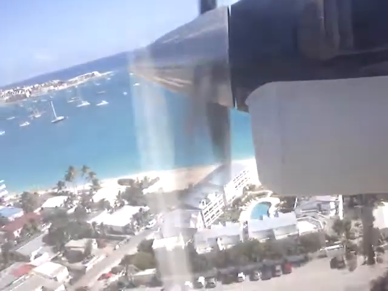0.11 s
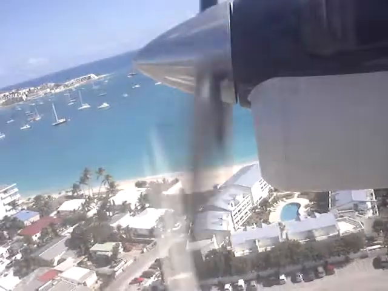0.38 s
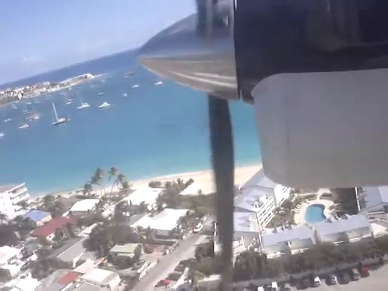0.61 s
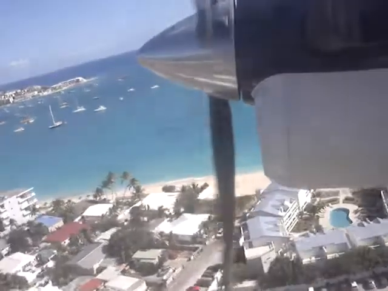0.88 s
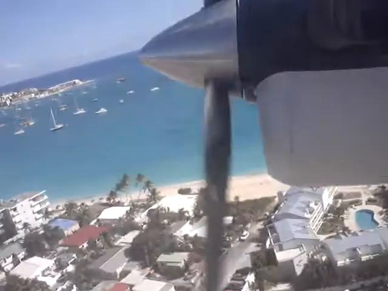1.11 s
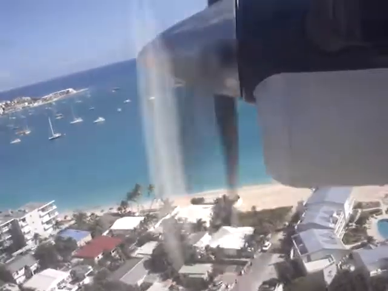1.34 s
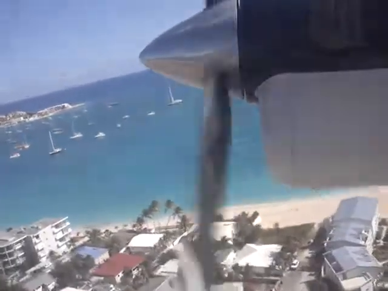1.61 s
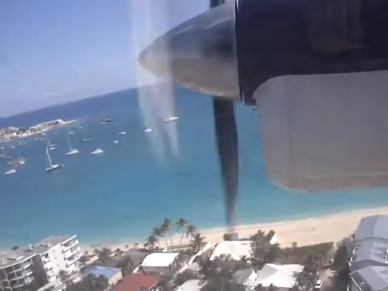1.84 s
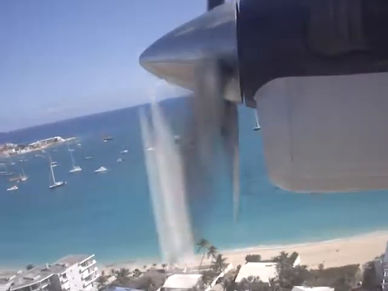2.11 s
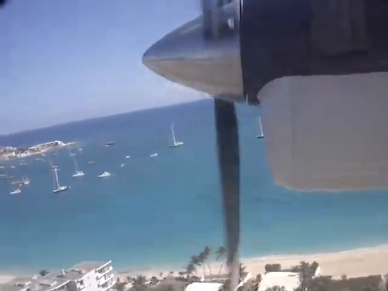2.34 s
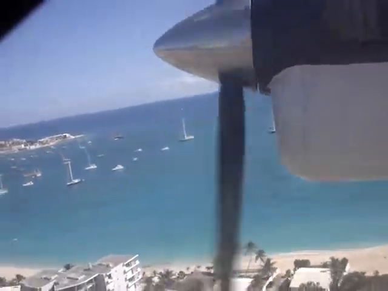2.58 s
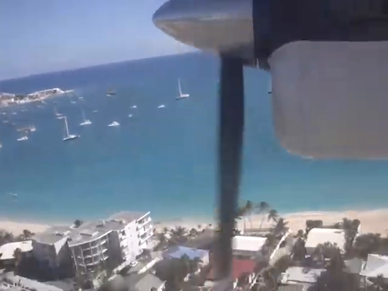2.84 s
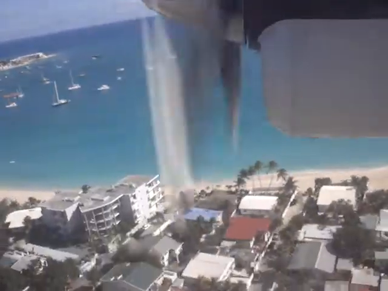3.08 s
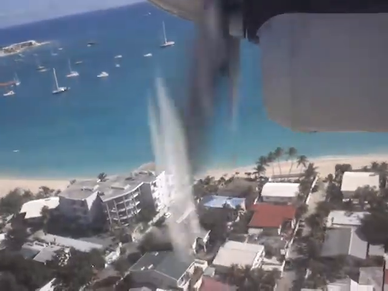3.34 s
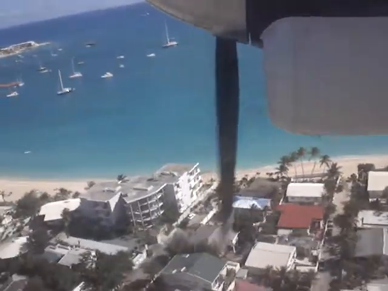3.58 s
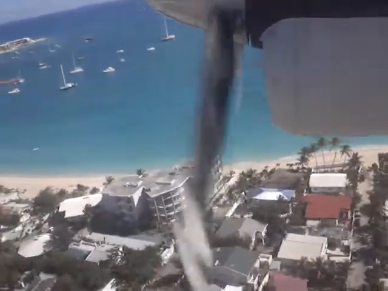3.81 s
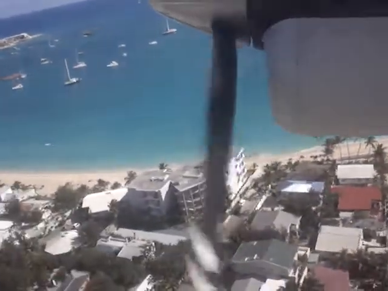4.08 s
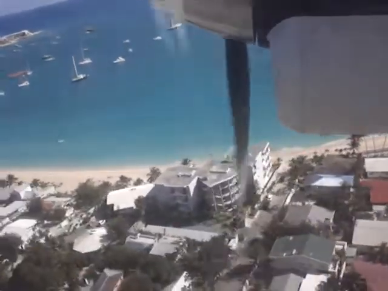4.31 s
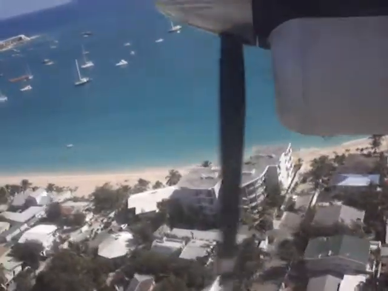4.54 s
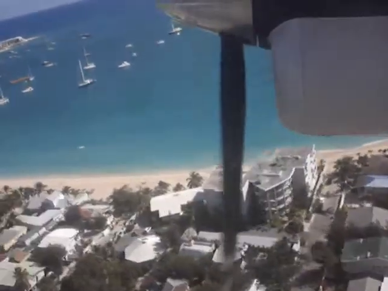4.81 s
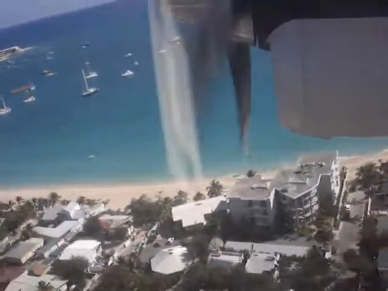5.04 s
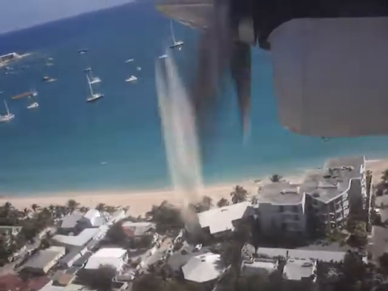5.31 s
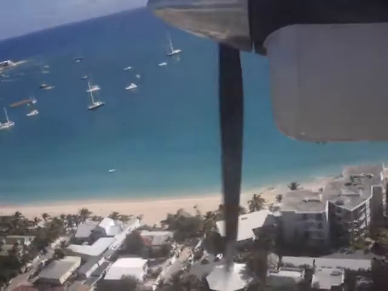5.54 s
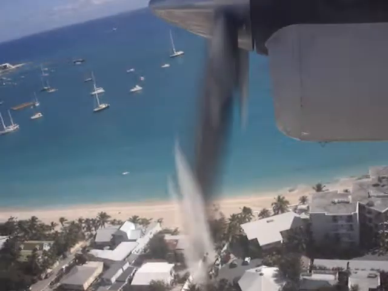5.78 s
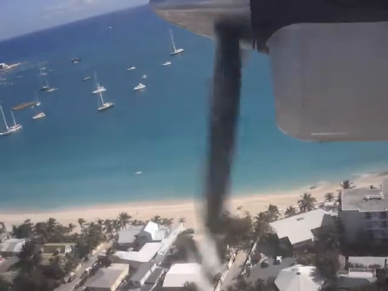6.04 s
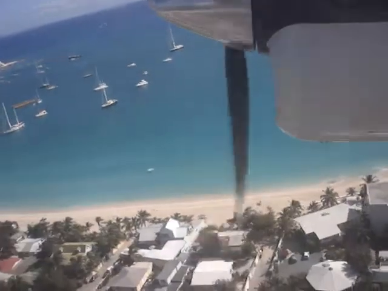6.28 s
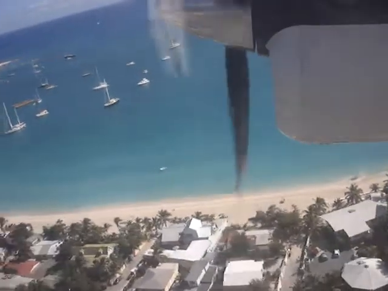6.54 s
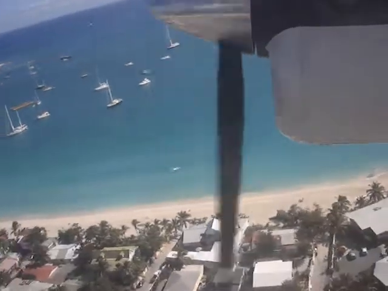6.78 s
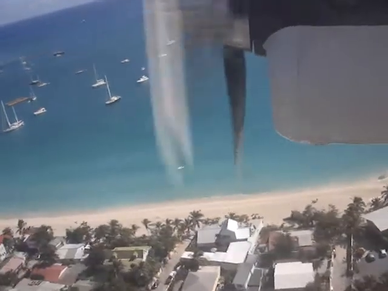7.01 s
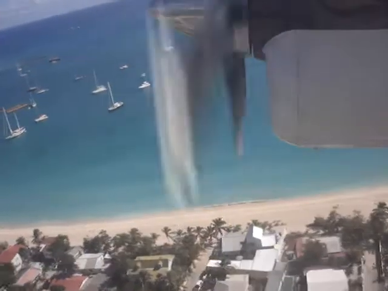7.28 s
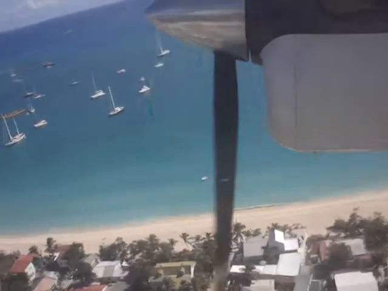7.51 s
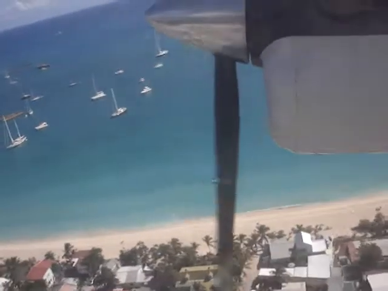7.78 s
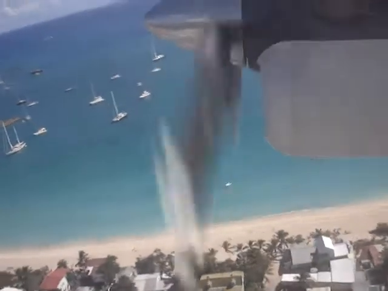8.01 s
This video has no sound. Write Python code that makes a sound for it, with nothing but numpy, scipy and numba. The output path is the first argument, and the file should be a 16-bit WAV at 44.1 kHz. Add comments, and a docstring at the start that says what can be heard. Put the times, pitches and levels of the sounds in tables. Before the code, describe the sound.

Loud steady buzzing drone of twin propellers heard inside an aircraft cabin, slowly throbbing about once a second over a broad rush of air.

```python
"""Eight seconds inside the cabin of a climbing twin propeller aircraft. From the start, two three-bladed propellers
drone at slightly different speeds, so their harmonics beat, and both ring the same cabin modes. Air roars along
the hull, thinning slowly; turbines whine and gears whistle faintly. For the first five seconds the roar at times
swells and the near third harmonic swells or dips; from 1.25 s to the end the whistle swells four times.
Throughout, an automatic gain control pumps with the beats."""
import sys
import numpy as np
from scipy import signal
from scipy.fft import rfft, irfft, next_fast_len
from scipy.io import wavfile
from scipy.ndimage import uniform_filter1d, minimum_filter1d, map_coordinates
from numba import njit

SR = 44100
rng = np.random.default_rng(int(sys.argv[2]) if len(sys.argv) > 2 else 0)


def to_wav(sig):
    """Store sig (one row per channel, or 1-D mono) as 16-bit WAV at the path in sys.argv[1].

    Samples outside -1..1 are clipped; the rate is SR.
    """
    pcm = np.clip(np.atleast_2d(sig), -1, 1) * 32767
    pcm = np.round(pcm).astype(np.int16)
    wavfile.write(sys.argv[1], SR, pcm.T)  # frames by channels


def volts_from_db(level):
    """Convert decibel levels to linear amplitude ratios."""
    exponent = np.asarray(level, float) / 20
    return 10 ** exponent


N = 358533


def unit(x):
    """Scale a sound to an rms of 1."""
    return x / np.sqrt(np.mean(x ** 2) + 1e-20)


def curves(rows):
    """Join the points of a table by straight lines: one curve for each column after the time."""
    seconds, *columns = np.transpose(rows)
    return [np.interp(np.arange(N) / SR, seconds, column) for column in columns]


def wobble(rate):
    """Draw a smooth random curve through `rate` random points a second."""
    points = rng.standard_normal(int(N * rate / SR) + 4)
    return map_coordinates(points, [np.arange(N) * rate / SR])


def filtered(x, response):
    """Multiply the spectrum of x by a response, given as a function of frequency in Hz."""
    size = next_fast_len(N + 8192)
    spectrum = rfft(x, size) * response(np.fft.rfftfreq(size, 1 / SR))
    return irfft(spectrum, size)[:N]


# Blade passing rate of the near propeller as its governor hunts: (time [s], rate [Hz])
NEAR_RATE = [(0.0, 104.25), (0.43, 104.81), (1.0, 104.704), (1.44, 104.104), (3.6, 104.829),
             (4.33, 104.572), (4.67, 104.852), (5.71, 104.82), (5.82, 104.659), (7.3, 104.847),
             (7.48, 105.101), (8.13, 104.525)]
# How much faster the far blades pass, which is the beat rate of the fundamentals: (time [s], difference [Hz])
FAR_LEAD = [(0.0, 1.06), (0.4, 0.784), (0.63, 1.196), (1.31, 1.288), (1.63, 0.622), (1.96, 1.809),
            (2.22, 2.13), (2.64, 1.391), (2.85, 0.521), (3.2, 1.03), (3.88, 1.349), (4.47, 0.906),
            (5.22, 1.225), (6.36, 1.138), (6.57, 1.29), (7.13, 0.912), (7.24, 1.123), (8.13, 1.357)]


def blade_rates():
    """Blade passes per second of the near and the far propeller; their difference makes the beats."""
    near_hz = curves(NEAR_RATE)[0]
    return near_hz, near_hz + curves(FAR_LEAD)[0]


# Passing level changes: the roar swells or stays, the near third harmonic swells or dips:
# (peak time [s], build-up time [s], change of roar [dB], change of third harmonic [dB])
LEVEL_CHANGES = [(0.05, .3, 1, 0.5), (.7, .2, 0, -2.5), (1.02, .15, 0.5, -1), (1.4, .2, .5, 2.5),
                 (1.94, .1, 0, 1), (2.43, .3, 0.5, -1.5), (2.82, .4, 3, 6), (3.8, .2, 1.5, 0.5),
                 (4.71, .2, 1, 1)]


def level_changes():
    """Level changes of roar and third harmonic in dB: each builds up to a peak, then dies away quickly."""
    t = np.arange(N) / SR
    fall_s = 0.12
    total = np.zeros((2, N))
    for peak_s, build_s, *change_db in LEVEL_CHANGES:
        shape = np.exp(-np.abs(t - peak_s) / np.where(t < peak_s, build_s, fall_s))
        total += np.outer(change_db, shape)
    return total


# Turbine and gearbox tones: (frequency [Hz], rms level about which it wavers [dB])
WHINE_TONES = [(3072, -63.5), (7790, -77), (7896, -78.5), (8209, -82.5), (8421, -82), (8476, -81),
               (9540, -80), (9647, -78.5), (9790, -83.5), (9895, -83)]


def whine():
    """Turbines and gearboxes: thin tones whose level and phase waver a little."""
    t = np.arange(N) / SR
    out = np.zeros(N)
    for hz, db in WHINE_TONES:
        level = np.sqrt(2) * volts_from_db(db + 3.3 * wobble(2.5))
        out += level * np.sin(2 * np.pi * hz * t + 3 * wobble(4))
    return out


# Swells of the gear whistle: (start time [s], length [s], lift [dB])
WHISTLE_SWELLS = [(1.25, 0.9, 8), (4.1, .25, 4.5), (6.7, .25, 6), (7.4, .7, 6)]


def whistle(blade_hz):
    """Meshing gear teeth: one faint tone that follows the speed of the near propeller shaft."""
    t = np.arange(N) / SR
    teeth = 85  # meshes per turn of the shaft
    rest_db, edge_s = -63, .12  # rms level between swells; softness of their rise and fall

    def step_up(start_s):
        return (1 + np.tanh((t - start_s) / edge_s)) / 2

    db = rest_db
    for start_s, length_s, lift_db in WHISTLE_SWELLS:
        db = db + lift_db * (step_up(start_s) - step_up(start_s + length_s))
    turns = np.cumsum(blade_hz / 3) / SR  # three blades
    return np.sqrt(2) * volts_from_db(db) * np.sin(2 * np.pi * teeth * turns + wobble(6))


# Tone colour of the air along the hull: (frequency [Hz], relative level per Hz [dB])
AIR_COLOUR = [(15, -13.5), (40, -8.5), (150, -2), (400, 1.5), (700, 4), (1000, -1), (1400, -4), (2000, -8),
              (2700, -16.5), (3300, -16.5), (4500, -24.5), (5500, -26), (6500, -30.5), (9300, -36),
              (9650, -30), (10000, -34.5)]


def air(blade_hz, roar_change_db):
    """Turbulent air along the hull: patchy coloured noise, throbbing a little with each blade pass."""
    start_db, fade_db_per_s = -29.5, .15  # the roar thins slowly in the climb
    hiss_rest_db, hiss_growth = -.4, .5  # above 5 kHz: extra level, and extra dB per dB of roar change
    roar_db = start_db - fade_db_per_s * np.arange(N) / SR + roar_change_db
    hiss_db = hiss_rest_db + hiss_growth * roar_change_db

    spectrum = signal.stft(rng.standard_normal(N), nperseg=512)[2]
    patches = uniform_filter1d(rng.standard_normal(spectrum.shape), 6, 0)  # smooth in frequency
    patches = uniform_filter1d(patches, 12, 1)  # smooth in time
    noise = signal.istft(spectrum * volts_from_db(0.93 * unit(patches)), nperseg=512)[1][:N]
    noise *= 1 + 0.073 * np.cos(2 * np.pi * np.cumsum(blade_hz) / SR)

    f, db = np.transpose(AIR_COLOUR)
    roar = unit(filtered(noise, lambda hz: volts_from_db(np.interp(np.log(hz + 1), np.log(f + 1), db))))
    hiss = filtered(roar, lambda hz: 1 / (1 + (5000 / (hz + 1)) ** 3))
    return volts_from_db(roar_db) * (roar + (volts_from_db(hiss_db) - 1) * hiss)


# Lines left by unequal near blades: (multiple of the shaft rate [1], rms level about which it wavers [dB])
SHAFT_LINES = [(2, -59.5), (4, -56), (5, -47.5), (7, -44), (8, -40.5), (10, -42.5), (11, -40.5),
               (13, -52.5), (14, -54.5), (16, -46.5), (17, -56), (19, -51), (20, -56), (22, -58), (23, -51),
               (26, -48)]


def imbalance(blade_hz):
    """Unequal near blades: the pattern repeats once a turn, giving tones at multiples of the shaft rate."""
    turn = 2 * np.pi * np.cumsum(blade_hz / 3) / SR  # three blades
    out = np.zeros(N)
    for multiple, db in SHAFT_LINES:
        level = np.sqrt(2) * volts_from_db(db + 1.3 * wobble(3))
        out += level * np.cos(multiple * turn + 2 * np.pi * rng.random())
    return out


# Cabin modes: (frequency [Hz], width [Hz], signed drive by near propeller [1], signed drive by far propeller [1])
CABIN_MODES = [(112.5, 20.0, -0.1646, -0.0612), (211.9, 20.0, 0.2427, -0.0432),
               (258.0, 31.4, -0.3078, 0.1287), (399.9, 148.5, 0.0867, 0.0562),
               (532.6, 75.2, -0.2114, -0.2406), (533.1, 20.0, 0.3534, 0.2668),
               (743.5, 132.2, -0.0053, -0.0923), (752.5, 271.2, 0.0347, 0.0976),
               (889.0, 185.2, -0.0147, -0.0434)]
# Wall panels that lift or lower single upper harmonics: (frequency [Hz], width [Hz], level [dB])
WALL_PANELS = [(1160, 47, -3.5), (1540, 50, 3), (1840, 60, 4), (2100, 44, 2.5)]
# How far each pulse trails its clock: (near propeller [blade passes], far propeller [blade passes])
PULSE_LAG = [.160, .578]


def propeller(hz, side, flutter, edge_db, top_hz, third_db=0):
    """One sharp pulse per blade pass, built from harmonics coloured by the cabin; side 0 is near, 1 is far."""
    turn = 2 * np.pi * (np.cumsum(hz) / SR - PULSE_LAG[side])
    centre, width, *drives = np.transpose(CABIN_MODES)
    drive = drives[side]
    unrest = [wobble(5) + 1j * wobble(5) for _ in range(6)]
    blade, harmonic, out = np.exp(1j * turn), 1, np.zeros(N)
    for order in range(1, 33):
        harmonic = harmonic * blade
        f = order * hz.mean()
        ring = np.sum(drive * 1j * f * width / (centre ** 2 - f * f + 1j * f * width))
        ring *= volts_from_db(edge_db / (1 + (690 / f) ** 10))  # fast blade tips sharpen the pulse
        ring /= np.sqrt(1 + (f / top_hz) ** 6)  # the hull damps the highest harmonics
        ring *= volts_from_db(sum(db / (1 + ((f - c) / w) ** 2) for c, w, db in WALL_PANELS))
        if order > 10:  # short waves scatter about the cabin and lose step
            ring *= np.exp(2j * np.pi * rng.random())
        # turbulent inflow blurs higher harmonics more
        unsteady = 1 + flutter * order ** 0.94 * unrest[order % 6]
        tone = (ring * unsteady * harmonic).real
        if order == 3:
            tone = tone * volts_from_db(third_db)
        out += tone
    return out


def scene():
    """Add up the turbines, the gears, the air and both propellers."""
    near_hz, far_hz = blade_rates()
    roar_change_db, third_change_db = level_changes()
    background = whine() + whistle(near_hz) + air(near_hz, roar_change_db)
    near = propeller(near_hz, 0, flutter=0.011, edge_db=4.0, top_hz=2350, third_db=third_change_db - 0.44)
    far = propeller(far_hz, 1, flutter=.015, edge_db=4.5, top_hz=1310)
    return (background + imbalance(near_hz) + near + far)[None]


@njit
def follow(peak, attack, release, start):
    """Envelope that climbs fast and sinks slowly, by a fraction of the remaining gap each sample."""
    out, level = np.empty_like(peak), start
    for i in range(len(peak)):
        level += (attack if peak[i] > level else release) * (peak[i] - level)
        out[i] = level
    return out


def roll_off(x):
    """The treble ends steeply here."""
    return signal.sosfilt(signal.butter(12, 10185, fs=SR, output="sos"), x)


def record(dry):
    """Gain control evens out the peaks, the input stage rounds the tallest, and the band ends steeply."""
    attack_s, release_s, top_hz = 0.0047, .055, 10020
    peak = -minimum_filter1d(-np.abs(dry[0]), size=441, origin=220)  # highest peak within 10 ms
    level = follow(peak, 1 / (attack_s * SR), 1 / (release_s * SR), .4)
    level = uniform_filter1d(level, size=441) ** 0.82  # below 1: some of the ups and downs remain
    held = dry[0] * volts_from_db(-4.0) / level
    rounded = held / (1 + np.abs(held / .76) ** 6) ** (1 / 6)
    mix = filtered(rounded, lambda hz: 1 / (1 + (hz / top_hz) ** 150))
    return roll_off(mix)


dry = scene()
out = record(dry)
to_wav(out)
```